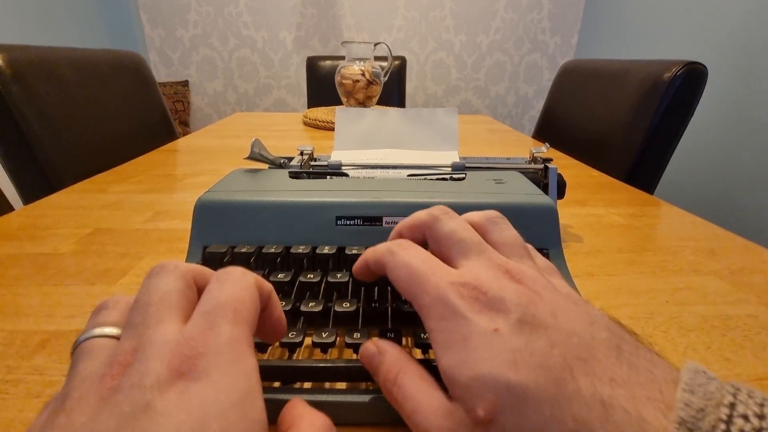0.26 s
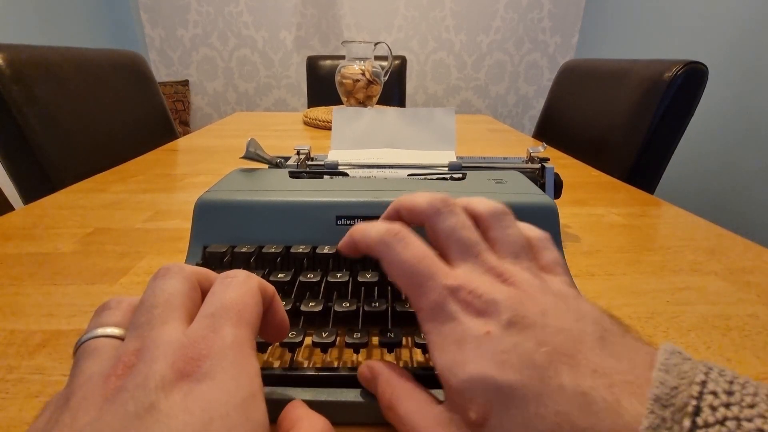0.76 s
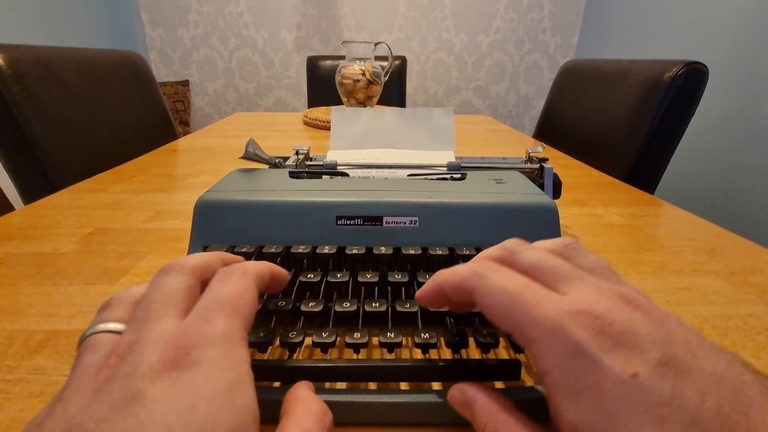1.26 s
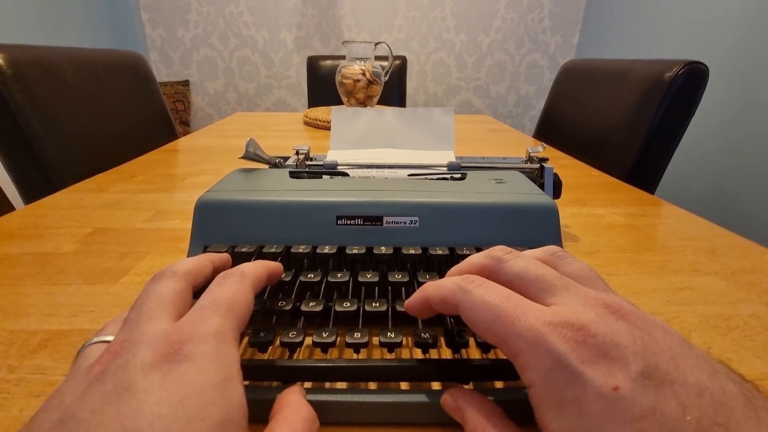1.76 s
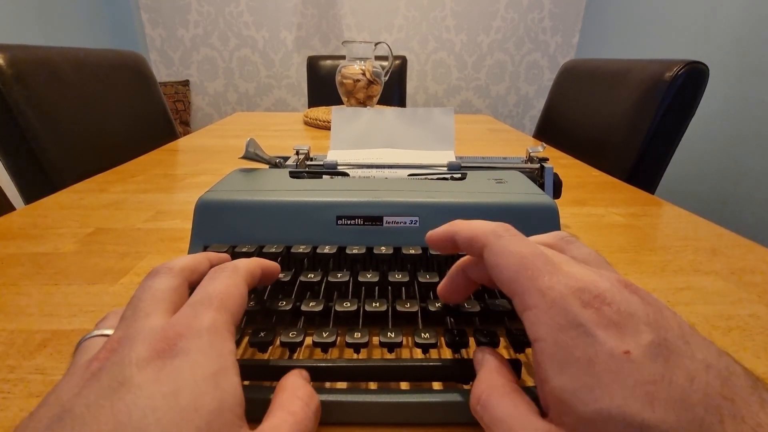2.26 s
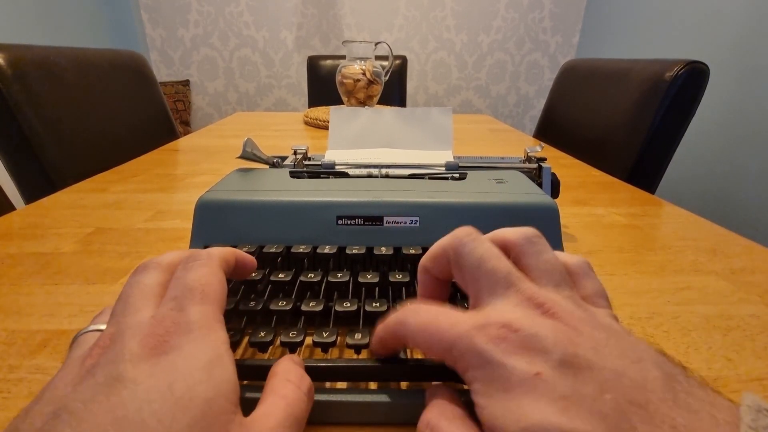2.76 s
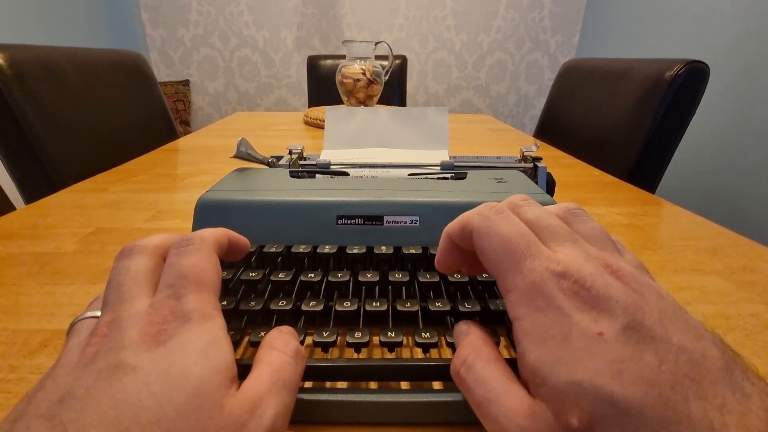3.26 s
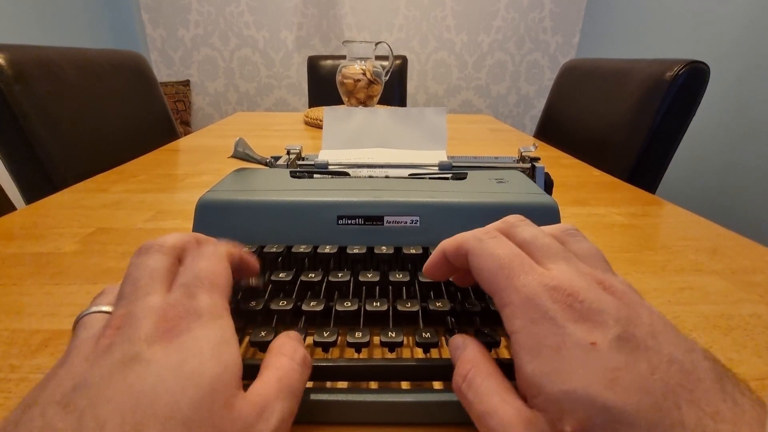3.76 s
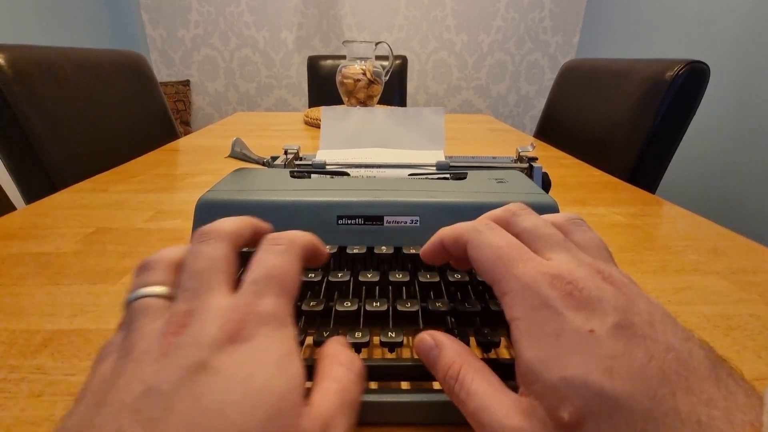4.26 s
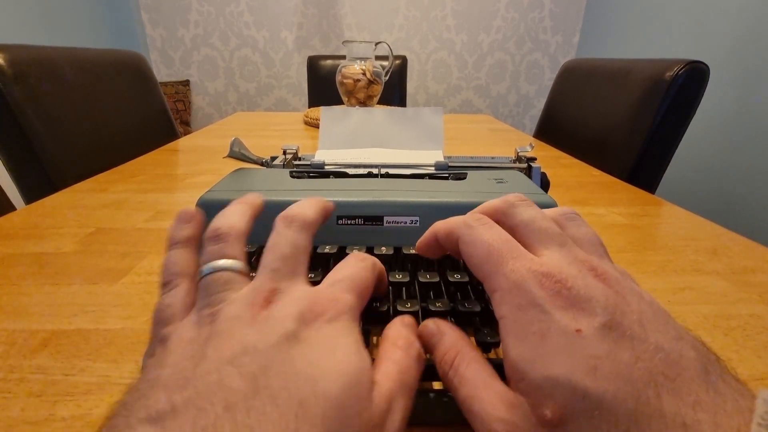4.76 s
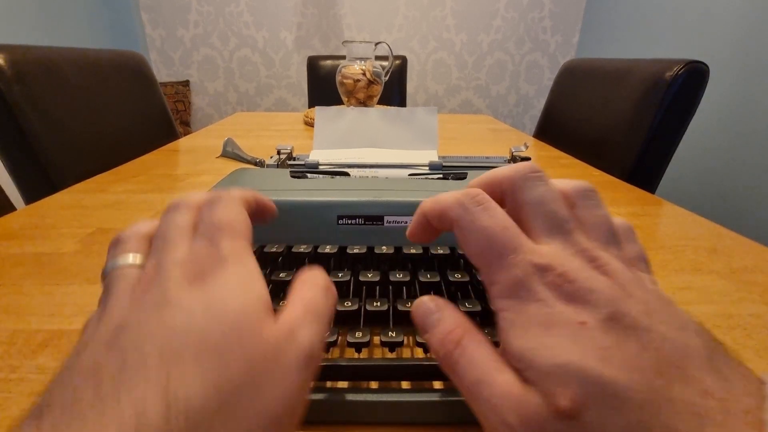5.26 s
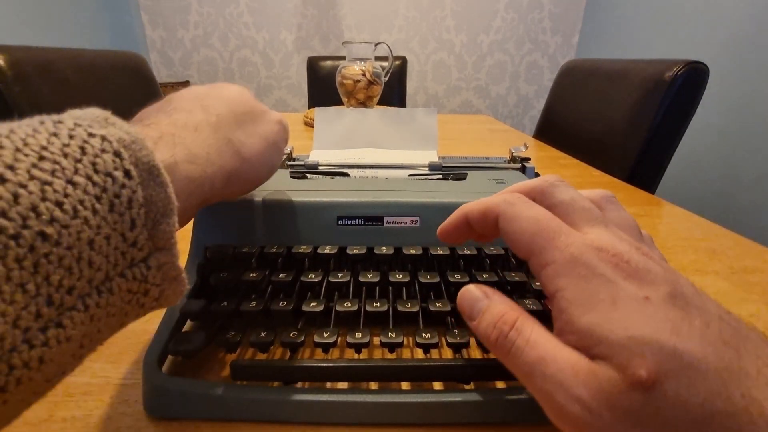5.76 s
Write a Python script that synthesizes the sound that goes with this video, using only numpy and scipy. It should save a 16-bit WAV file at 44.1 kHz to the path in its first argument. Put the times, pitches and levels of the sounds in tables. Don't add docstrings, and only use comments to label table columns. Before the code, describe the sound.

A manual typewriter on a wooden table: spaced sharp key cracks, clattering returns and dull table thumps, ending with a small carriage lever click.

```python
import sys
import numpy as np
from scipy import signal
from scipy.fft import rfft, irfft
from scipy.io import wavfile
from scipy.ndimage import uniform_filter1d

SR = 44100
rng = np.random.default_rng(int(sys.argv[2]) if len(sys.argv) > 2 else 0)


def field_ratio(decibels):
    return 10 ** (np.asarray(decibels, dtype=float) / 20)


def transcribe(signal):
    frames = np.atleast_2d(signal).T
    limited = np.clip(frames, -1, 1)
    pcm = np.round(limited * 32767).astype(np.int16)
    wavfile.write(sys.argv[1], SR, pcm)


N = 265923
T = np.arange(N) / SR

# [t/s, crack peak level/dB, brightness/dB, boom peak level/dB, boom delay/ms]
STRIKES_S_DB_MS = [
    (0.6762, -7, 0.5, -29.5, 26),
    (2.6948, -8, -2, -27.5, 29),
    (2.915, -6, 0, -26.5, 24),
    (3.1868, -10, -1.5, -29, 15.3),
    (3.7926, -6.5, 0.1, -29.5, 33),
    (4.8527, -5, -0.1, -31.5, 13),
    (5.0617, -9, 0.5, -26, 35.6),
    (5.2531, -7, 0.5, -28.5, 33),
]
# [t/s, clack peak level/dB, boom peak level/dB]
PRESSES_S_DB = [
    (0.6481, -24.5, -22),
    (2.6493, -38.5, -38),
    (2.6691, -37, -45),
    (2.8779, -27.5, -29),
    (3.1313, -33.5, -31.5),
    (3.7587, -29, -29.5),
    (4.8242, -27, -26),
    (5.018, -23.5, -28.5),
    (5.2212, -24.5, -31.5),
]
# [t/s, clack peak level/dB, boom peak level/dB]
RETURNS_S_DB = [(0.0004, -22.5, -30), (0.8017, -19.5, -25.5), (0.9535, -19.5, -28.5), (2.7996, -30, -36.5),
                (2.838, -19.5, -27.5), (3.045, -17.5, -30), (3.2924, -17.5, -30.5), (3.927, -18.5, -28),
                (4.9863, -24.5, -33), (5.189, -20, -44), (5.3605, -19, -33.5)]
# [t/s, clack peak level/dB, brightness/dB, boom peak level/dB, knock re boom/dB]
SPACES_S_DB = [
    (0.2496, -25, 2.5, -29, -8),
    (0.2749, -28, -4, -28.5, -1),
    (0.8715, -23.5, -1.5, -26, -10),
    (0.9799, -33.5, -5, -30.5, -5),
    (4.2315, -27.5, -1, -28, -15),
    (4.268, -37.5, 0.5, -35, -16.5),
    (4.335, -25.5, -1.5, -29.5, -3.5),
]
# [t/s, clack peak level/dB, boom peak level/dB]
LEVER_S_DB = [
    (5.8746, -50.5, -70.5),
    (5.8901, -35, -49),
    (5.9786, -31.5, -39),
]
# [t/s, clack peak level/dB, boom peak level/dB]
TOUCHES_S_DB = [
    (0.147, -63, -47.5),
    (0.1864, -56.5, -54),
    (1.169, -77, -58),
    (4.4391, -58.5, -60),
    (4.793, -51, -48),
    (5.702, -85, -51),
    (5.792, -73.5, -53.5),
]


def unit(x):
    return x / np.sqrt(np.mean(x ** 2))


def band(x, lo_hz, hi_hz):
    edges_hz = [lo_hz, min(hi_hz, SR / 2 - 500)]
    return signal.sosfilt(signal.butter(2, edges_hz, "band", fs=SR, output="sos"), x)


def fade(t, t60_s):
    return (t >= 0) * field_ratio(-60 * np.clip(t, 0, None) / t60_s)


def ring(x, modes):
    out = 0
    for hz, t60_s, db in modes:
        r = field_ratio(-60 / t60_s / SR)
        poles = [2, -4 * r * np.cos(2 * np.pi * hz / SR), 2 * r * r]
        out = out + field_ratio(db) * signal.lfilter([1 - r * r, 0, r * r - 1], poles, x)
    return out


def add(track, start_s, sound):
    i = int(start_s * SR)
    track[..., i:i + sound.shape[-1]] += sound[..., :N - i]


def grit(shape, spread_db):
    return unit(rng.standard_normal(shape) * field_ratio(spread_db * rng.exponential(size=shape)))


def fridge():
    # [f/Hz, level/dB per Hz]
    air_hz_db = [(15, -35.5), (25, 0), (97, -4), (120, -10.5), (149, -6.5), (229, -11), (317, -2),
                 (394, -15), (531, -10.5), (591, -16), (677, -10.5), (962, -21), (1250, -15), (1450, -33),
                 (16000, -47)]
    # [f/Hz, rms level/dB]
    hum_hz_db = [(48.4, -83.5), (96.9, -80.5), (150.7, -81), (317.6, -88), (532.9, -82), (640.6, -84),
                 (694.4, -86), (1039, -90.5), (1087, -83.5), (1136, -94.5), (1238, -88)]
    air_db = -69.5
    log_hz = np.log(np.fft.rfftfreq(N, 1 / SR) + 1)
    hz, db = np.transpose(air_hz_db)
    shape = field_ratio(np.interp(log_hz, np.log(hz), db))
    mid, side = irfft(rfft(rng.standard_normal((2, N))) * shape, N)
    out = field_ratio(air_db - 2) * unit(mid + 1.4 * side * np.array([[1], [-1]]))
    for hz, db in hum_hz_db:
        slow = uniform_filter1d(uniform_filter1d(rng.standard_normal((2, N)), SR // 8), SR // 8)
        drift, swell = slow * np.sqrt(SR / 8)
        phase = 2 * np.pi * np.cumsum(hz * (1 + 0.0013 * drift)) / SR
        phase = phase + 2 * np.pi * rng.random((2, 1)) * min(hz / 1500, 1)
        out = out + field_ratio(db + 2.5 + 1.6 * swell) * np.sin(phase)
    return out


def room():
    # [delay/ms, level/dB]
    echoes_ms_db = [
        (2.1, -14),
        (8.3, -9),
        (15.5, -19),
    ]
    # [f/Hz, t60/s, level/dB]
    tail_hz_s_db = [(133, 0.42, -24.5), (314.8, 0.36, -19.5), (1000, 0.29, -13), (3100, 0.33, -9.5),
                    (5557, .34, -14.5), (12360, 0.3, -8.5)]
    t = np.arange(int(SR * 0.6)) / SR
    response = 0
    for hz, t60_s, db in tail_hz_s_db:
        mid, side = band(rng.standard_normal((2, len(t))), hz / 1.606, hz * 1.523)
        both = mid + min(hz / 350, 1) * side * np.array([[1], [-1]])
        both = both * fade(t, t60_s) * (1 - fade(t, 0.032))
        response = response + field_ratio(db) * both / np.sqrt(np.sum(both ** 2) / 2)
    smear = rng.standard_normal((len(echoes_ms_db), 2, 90)) * fade(t[:90], 0.004)
    smear = band(smear, 900, 14000) / np.sqrt(13)
    for (ms, db), wall in zip(echoes_ms_db, smear):
        response[:, int(ms * SR / 1000):][:, :90] += field_ratio(db) * wall
    response[0, 0] += 1
    response[1, 4] += 1
    return response


def thud_rows():
    # delay/ms, knock re boom/dB, push/ms
    kinds = [(PRESSES_S_DB, (-4, -6, 13)), (RETURNS_S_DB, (-14, -6, 11)),
             (LEVER_S_DB, (8.3, -10.5, 6.5)), (TOUCHES_S_DB, (0.3, -12.5, 14))]
    rows = []
    for events, (delay_ms, knock_db, push_ms) in kinds:
        rows += [(max(s + delay_ms / 1000, 0), db, knock_db, push_ms) for s, _, db in events]
    for s, crack_db, _, boom_db, delay_ms in STRIKES_S_DB_MS:
        rows.append((s + delay_ms / 1000, boom_db, -11.5, 29))
        rows.append((s, crack_db - 25, -3.5, 5.9))
    for s, _, _, db, knock_db in SPACES_S_DB:
        rows.append((s - 2.5 / 1000, db, knock_db, 11))
    return rows


def table():
    # [f/Hz, t60/s, level/dB]
    top_modes = [(74.7, 0.23, 1), (78.5, 0.22, -2.5), (105, 0.25, -10), (137, 0.21, -7.5),
                 (167.6, 0.055, -15)]
    # [f/Hz, t60/s, level/dB]
    frame_modes = [(233.3, .1, 10), (256, 0.36, 0), (321, 0.15, -3.5), (400, .06, -10.5), (614, 0.052, 1.5),
                   (673, 0.11, -10.5), (950, 0.2, -7)]
    out = np.zeros(N)
    t = np.arange(SR // 4) / SR
    for s, db, knock_db, push_ms in thud_rows():
        push = np.sin(np.pi * np.clip(t * 500 / max(push_ms, 1), 0, 1)) ** 2
        push = push * rng.standard_normal(len(t))
        boom = band(ring(push, top_modes), 55, 350)
        knock = ring(push, frame_modes)
        add(out, s, field_ratio(db - 1) * boom / np.abs(boom).max() * np.cos(2 * np.pi * t))
        add(out, s, field_ratio(db + knock_db - 3.5) * knock / np.abs(knock).max())
    return out


def slides():
    # [end t/s, level/dB, rise/(dB/ms)]
    slack_s_db = [
        (0.646, -36.5, 2.4),
        (2.647, -53, 2.5),
        (3.755, -50, 3),
        (4.229, -27.5, 3.5),
        (4.82, -49.5, 1.8),
    ]
    # [t/s, length/s, start level/dB, end level/dB]
    rubs_s_db = [
        (0.4, 0.26, -77, -72.5),
        (1.092, 0.16, -63.5, -66),
        (2.49, 0.03, -81.5, -80.5),
        (4.176, 0.045, -81.5, -63),
        (4.768, 0.054, -68, -80),
        (5.557, 0.36, -77.5, -85.5),
        (5.895, 0.055, -46, -38),
        (5.975, 0.058, -36.5, -63),
    ]
    swing_db, swing_db_per_ms, edge_db_per_ms = -24.5, 0.6, 1.2
    gain = np.zeros(N)
    for s, db, rise_db_per_ms in slack_s_db:
        gain += field_ratio(db - rise_db_per_ms * 1000 * np.abs(s - T)) * (T < s)
    for s, crack_db, *_ in STRIKES_S_DB_MS:
        gain += field_ratio(crack_db + swing_db - swing_db_per_ms * 1000 * np.abs(s - T)) * (T < s)
    for s, length_s, start_db, end_db in rubs_s_db:
        outside_ms = 1000 * np.maximum(np.maximum(s - T, T - s - length_s), 0)
        level_db = np.interp(T, [s, s + length_s], [start_db, end_db])
        gain += field_ratio(level_db - edge_db_per_ms * outside_ms)
    return gain * field_ratio(-7.5) * unit(band(grit((2, N), 1.1), 750, 6300))


def pawl():
    # [t/s, f/Hz, t60/s, peak level/dB]
    parts_s_hz_db = [
        (0.2767, 389, 0.026, -26),
        (0.2765, 722, 0.023, -29.5),
        (4.365, 277, 0.05, -33.5),
        (4.365, 82.8, 0.19, -32),
        (5.8746, 4210, 0.018, -42),
        (5.8887, 3060, 0.0085, -36),
        (5.9811, 3270, 0.009, -29),
        (5.981, 810, 0.018, -39.5),
        (5.909, 143, 0.11, -39),
        (5.987, 138, 0.31, -35),
    ]
    out = np.zeros(N)
    t = np.arange(SR // 4) / SR
    for s, hz, t60_s, db in parts_s_hz_db:
        add(out, s, field_ratio(db) * fade(t, t60_s) * np.sin(2 * np.pi * hz * t))
    return out


def coloured(rows, colour_db, bright_db=0):
    s, db = np.transpose(rows)[:2]
    low_db, high_db, top_db, rattle_db = (v + 0 * s for v in colour_db)
    return np.transpose([s, db, low_db, high_db + bright_db, top_db + 2 * bright_db, rattle_db])


def hits(events, blows, rattle_t60_s, lift_db):
    band_hz = [250, 1100, 3000, 6300, 12500]
    t = np.arange(blows.shape[1]) / SR
    log_hz = np.log(np.fft.rfftfreq(len(t), 1 / SR) + 1)
    out = np.zeros((2, N))
    for (s, db, low_db, high_db, top_db, rattle_db), blow in zip(events, blows):
        rattle = grit((2, len(t)), 2.3) * fade(t, rattle_t60_s) * (1 - fade(t, 0.0037))
        colour = field_ratio(np.interp(log_hz, np.log(band_hz), [low_db - 3, low_db, 0, high_db, top_db]))
        blow = irfft(rfft(blow) * colour)
        blow = blow / np.abs(band(blow, band_hz[1], band_hz[3])).max()
        rattle = irfft(rfft(rattle) * colour)
        add(out, s, field_ratio(db + lift_db) * (blow + field_ratio(rattle_db) * rattle))
    return out


def lever_clacks():
    # low/dB, high/dB, top/dB re 3 kHz, rattle/dB
    events = np.vstack([
        coloured(PRESSES_S_DB, (5, 2.2, -3.5, -2)),
        coloured(RETURNS_S_DB, (-1, -1, -10.5, -9)),
        coloured(LEVER_S_DB, (2, -20.5, -18, -4.5)),
        coloured(TOUCHES_S_DB, (8.8, -14, -23, -3.5)),
        coloured(SPACES_S_DB, (2, -1.5, -15, -1), np.transpose(SPACES_S_DB)[2])])
    tick_db, tick_delay_ms = 7.5, 2.5
    t = np.arange(8192) / SR
    clacks = grit((len(events), len(t)), 1.8) * fade(t, 0.016) * (1 - fade(t, 0.012))
    clacks[:, int(tick_delay_ms * SR / 1000)] += field_ratio(tick_db)
    return hits(events, clacks, 0.15, -3.0)


def type_cracks():
    # [f/Hz, t60/s, level/dB]
    slug_modes = [(1200, 0.0045, 1), (3080, .006, -1.5), (6300, 0.0014, -1)]
    # [f/Hz, t60/s, level/dB]
    platen_modes = [(2680, .04, -5.5), (2723, 0.0074, 3), (2990, 0.023, -7.5), (3210, 0.019, -2),
                    (3140, 0.0067, -0.5), (3460, 0.091, -6.5)]
    t = np.arange(8192) / SR
    contact = 0.12 * rng.standard_normal((len(STRIKES_S_DB_MS), len(t))) * fade(t - 1 / 1000, 0.006)
    contact[:, SR // 1000] = 1
    cracks = field_ratio(-0.5) * contact + ring(contact, slug_modes) + field_ratio(2.0) * ring(contact, platen_modes)
    bright_db = np.transpose(STRIKES_S_DB_MS)[2]
    events = coloured(STRIKES_S_DB_MS, (-3.5, -0.4, -11.5, -17.5), bright_db)
    return hits(events, cracks, 0.15, 2.9)


def typewriter():
    # [f/Hz, t60/s, level/dB]
    shell_modes = [(661.4, 0.044, -1), (700.5, 0.17, -1.5), (945, 0.17, -1), (1160, 0.22, -13),
                   (1388, 0.2, -11), (2130, .04, -19), (2877, .04, -3.5), (3554, 0.021, -10.5),
                   (4040, .03, -7.5), (5230, .02, -13.5), (6710, 0.017, -11.5)]
    metal = pawl() + type_cracks() + lever_clacks() + slides()
    return metal + field_ratio(2.5) * ring(metal, shell_modes)


def scene():
    direct = typewriter() + table()
    return signal.fftconvolve(direct, room(), axes=1)[:, :N] + fridge()


def roll_off(x):
    return signal.sosfilt(signal.butter(12, 16500, fs=SR, output="sos"), x)


def record(dry):
    # [f/Hz, t60/s, level/dB]
    port_modes = [(14200, 0.0014, -2.5)]
    soft = np.tanh(0.81 * (dry + ring(dry, port_modes))) / 0.53
    cut = signal.sosfilt(signal.ellip(8, 0.2, 30, 15950, fs=SR, output="sos"), soft)
    return roll_off(cut)


dry = scene()
out = record(dry)
transcribe(out)
```